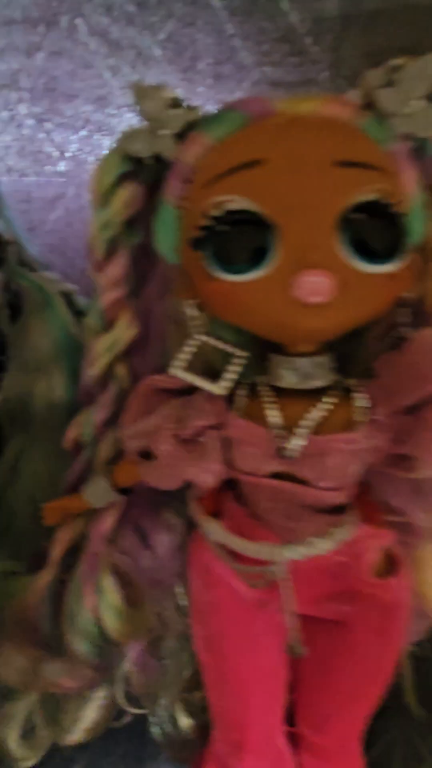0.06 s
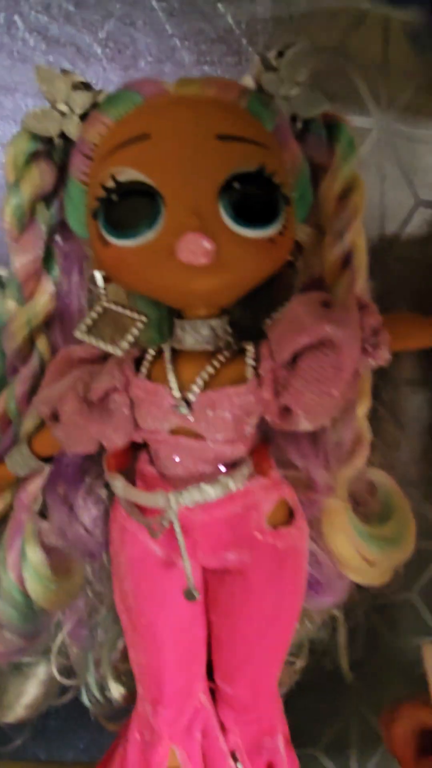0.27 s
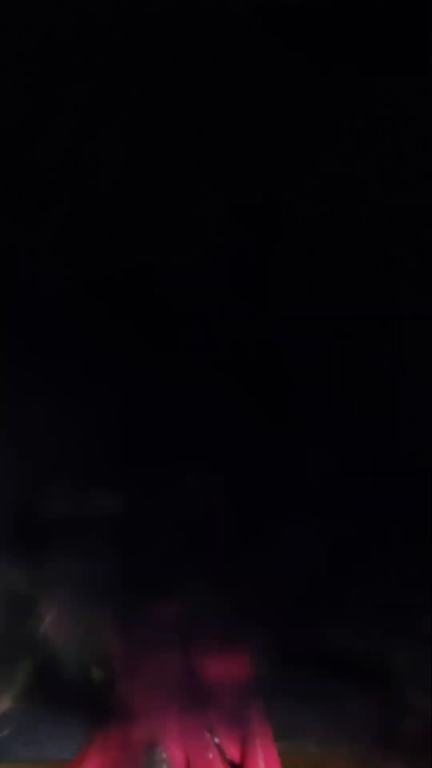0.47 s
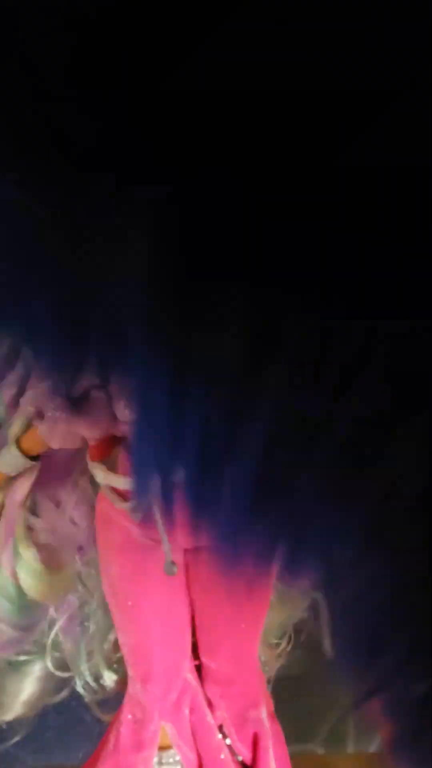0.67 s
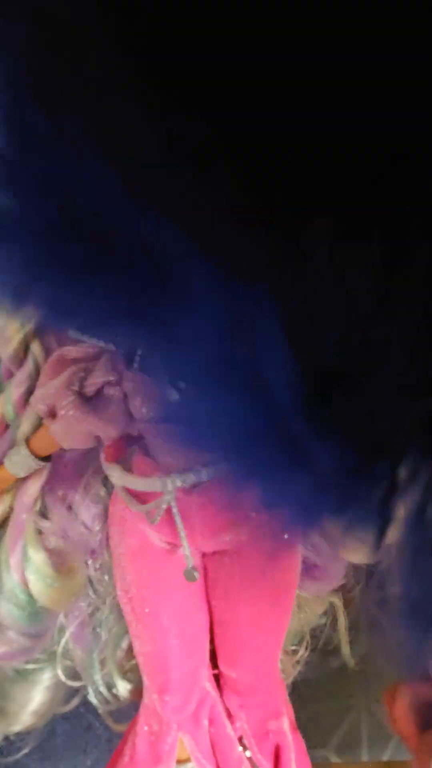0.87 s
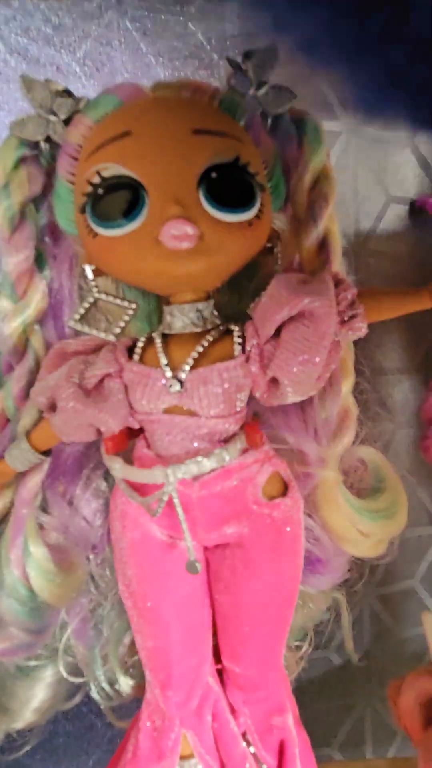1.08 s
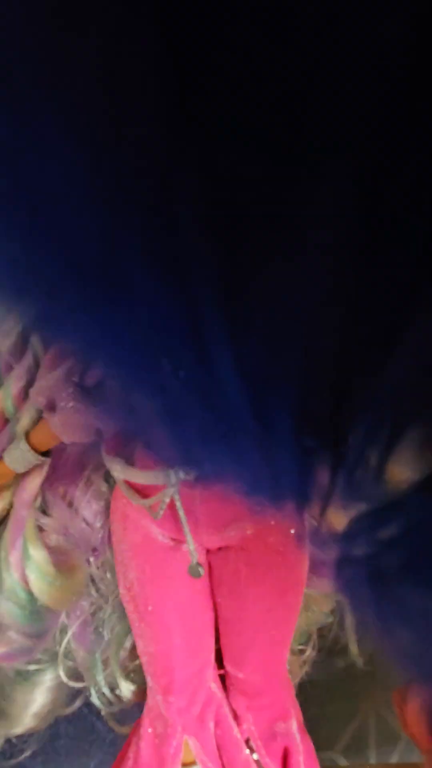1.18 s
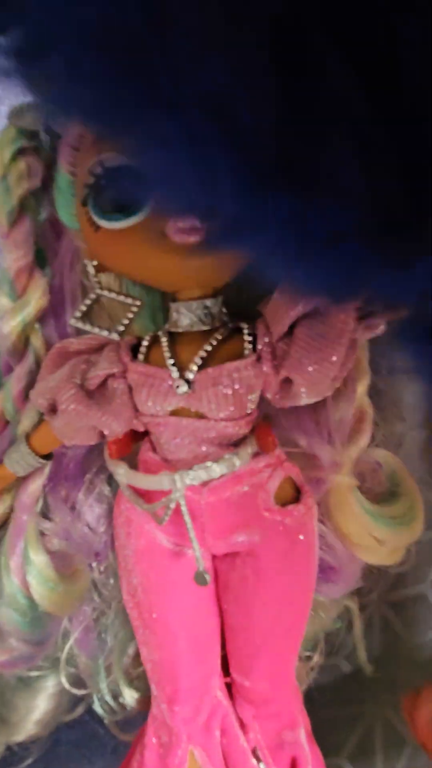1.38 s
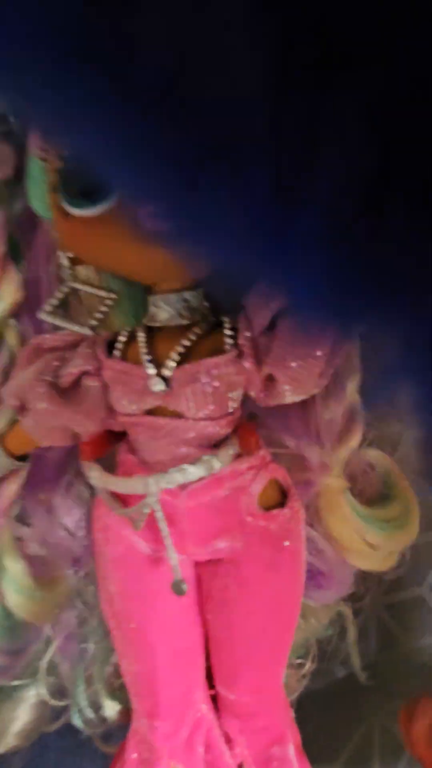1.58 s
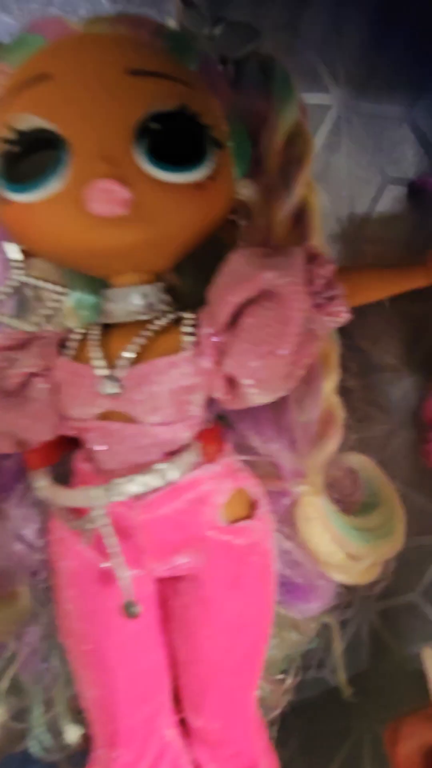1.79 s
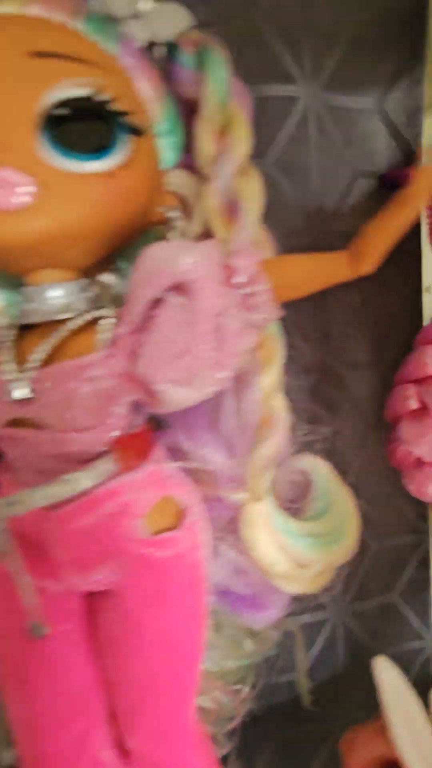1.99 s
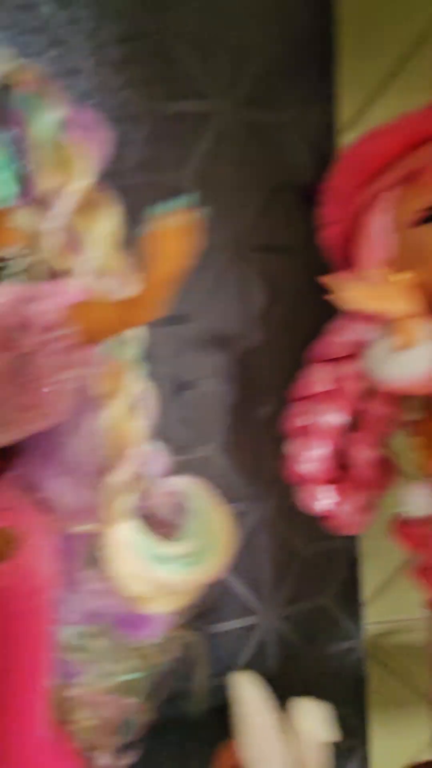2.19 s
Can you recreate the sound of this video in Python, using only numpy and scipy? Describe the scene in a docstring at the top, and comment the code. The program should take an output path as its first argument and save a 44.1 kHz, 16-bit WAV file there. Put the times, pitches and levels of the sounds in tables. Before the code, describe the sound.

Soft fibre brushing in uneven strokes against the left microphone, with dull thumps, in a quiet room

```python
"""From the start a low hum and faint room air, a sine and coloured noise, lie under a quiet room.
A fluffy duster is then swept several times over a small doll. Its fibres rustle on the left microphone
port as coloured random slips; the soft head bumps the housing as short low pulses; single fibres tick
as filtered clicks. The right microphone hears almost none of this. Late in the sweeping something small
and hard clacks in the room and bounces: impulses that set decaying modes ringing, and on the left a
filtered click for its low knock."""
import sys
import numpy as np
from scipy import signal
from scipy.fft import rfft, irfft
from scipy.io import wavfile

SR = 44100
rng = np.random.default_rng(int(sys.argv[2]) if len(sys.argv) > 2 else 0)


def materialize(psi):
    """Save the field psi as 16-bit PCM at rate SR to the path in sys.argv[1].

    A 1-D psi becomes a single channel; in a 2-D psi each row is a channel.
    """
    bounded = np.clip(np.atleast_2d(psi).T, -1, 1)
    quanta = np.round(bounded * 32767).astype(np.int16)
    wavfile.write(sys.argv[1], SR, quanta)


N = 99225
TIME = np.arange(N) / SR  # t/s

# Hum, rms: [t/s, left level/dB, right level/dB]
HUM_LEVEL = [(0, -61, -61), (.8, -55, -74.5), (1.1, -68, -75.5), (1.6, -54, -60), (2.25, -55, -59)]
HUM_HZ = 105.2
# Spectral density of the room air: [f/Hz, relative level/dB per Hz]
AIR_SPECTRUM = [(60, 5), (200, -11.5), (350, -12.5), (700, -21.5), (2500, -28), (3300, -34), (4600, -29),
                (6500, -40), (10000, -41)]
# Level of the room air, rms: [t/s, level/dB]
AIR_LEVEL = [(0, -65.5), (.3, -70.5), (1.0, -73)]

# Fibres on the port, before the trims: [t/s, body level/dB, middle level/dB, treble level/dB]
BRUSH_LEVEL = [(0.142, -95, -110, -110), (0.182, -81, -88, -65), (0.235, -91, -98, -95),
               (0.345, -81, -80, -81.5), (0.386, -63, -61, -72), (0.412, -52, -45.5, -47),
               (0.477, -71, -33.5, -51), (0.505, -63, -44, -50), (0.623, -59.5, -35.5, -47.5),
               (0.649, -64.5, -51, -83), (0.704, -53.5, -39, -53), (0.739, -57, -44, -48),
               (0.786, -64, -66, -77), (0.852, -66.5, -66.5, -71.5), (0.861, -46, -47, -70),
               (0.882, -60, -53.5, -59), (0.892, -49.5, -44.5, -47.5), (0.904, -41.5, -30.5, -46.5),
               (0.933, -49.5, -48, -56), (1.006, -69, -58, -63.5), (1.099, -100, -100, -92),
               (1.155, -54, -65.5, -82), (1.203, -55, -66, -58.5), (1.235, -32.5, -41.5, -46.5),
               (1.258, -66, -74.5, -69.5), (1.386, -87, -82, -83.5), (1.41, -42.5, -57, -52.5),
               (1.451, -65.5, -63, -69), (1.527, -43, -47, -53), (1.549, -77, -68, -71),
               (1.594, -75, -74, -78), (1.61, -49.5, -63, -65.5), (1.66, -51.5, -51, -63),
               (1.689, -56, -40.5, -56.5), (1.77, -49, -48, -59.5), (1.802, -77, -74, -73.5)]
BODY_TRIM_DB, MIDDLE_TRIM_DB, TREBLE_TRIM_DB = 11.5, -3, -2.5
# Spectral densities of the three parts of the rustle: [f/Hz, relative level/dB per Hz]
BODY_SPECTRUM = [(25, 0.5), (70, 12.5), (200, 1.5), (400, -8.5), (650, -14), (2500, -49.5)]
MIDDLE_SPECTRUM = [(250, 6), (600, -2), (850, -1), (1030, -6), (1330, -3.5), (2100, -8), (3500, -14),
                   (9000, -24)]
TREBLE_SPECTRUM = [(1500, -2), (4000, -5), (6600, -3), (7300, 1.5), (8200, -0.5), (9100, 2.5), (9900, -12),
                   (11500, -2.5), (15000, -3.5)]
# Mean rate of fibre slips: [body/(1/s), middle/(1/s), treble/(1/s)]
SLIP_RATE = (9000, 3000, 9000)
SLIP_SPREAD_DB, CLUMP_DB, CLUMP_RATE_HZ = 2.5, 2, 119
EDGE_FADE_S = 0.067  # time constant outside the first and last brush times

LEAK_ABOVE_HZ, RIGHT_LEAK_DB = 2000, -36.5
ROOM_T60_S, ROOM_DB = 0.16, -7.5

# Soft bumps on the housing: [t of the middle/s, envelope level/dB, f/Hz, envelope length/s]
BUMPS = [(0.252, -25.5, 55.8, 0.0067), (0.344, -34, 42.6, 0.0089), (0.863, -23.5, 69, 0.0024),
         (0.875, -17.5, 172, 0.0009), (0.8928, -15, 139, 0.0017), (0.914, -22, 44.2, 0.012),
         (1.038, -43, 53, 0.014), (1.213, -17, 128, 0.0019), (1.248, -20, 79, 0.0034),
         (1.27, -21.5, 61.8, 0.013), (1.429, -28.5, 69.7, 0.0057), (1.546, -20, 91, 0.0029),
         (1.564, -27.5, 71.6, 0.0097), (1.616, -22, 124.4, 0.0039), (1.798, -33, 49, 0.025)]

# Single fibres flicking the port, and at 1.403 s the low knock of the clack on the left:
# [t/s, peak level/dB, centre f/Hz, top edge f/Hz]
TICKS_AND_KNOCK = [(.344, -55, 9500, 15000), (0.357, -49, 9500, 14900), (0.376, -37.5, 169, 1570),
                   (0.472, -33, 1700, 4740), (.487, -30, 1400, 2830), (.692, -36.5, 2500, 12000),
                   (.824, -38.5, 5160, 7700), (.874, -28, 232, 2470), (.887, -27, 283, 5000),
                   (0.982, -29.5, 520, 14000), (1.180, -42.5, 130, 3900), (1.214, -28, 180, 5960),
                   (1.236, -29, 570, 9200), (1.403, -32.5, 132, 890), (1.713, -34, 2200, 4500)]
TICK_DECAY_S, TICK_CRUMBLE = 0.0034, 0.065  # crumble is noise height relative to the click

# Clack and its bounces: [t/s, level/dB, extra treble level/dB]
CLACKS = [(1.403, -43.5, -11), (1.41, -49, -4), (1.416, -42.5, -1.5), (1.422, -45.5, -1.5)]
# Modes of the clacking object: [f/Hz, relative level/dB, t60/s]
CLACK_MODES = [(1355, 0, 0.012), (1554, -5, 0.015), (1846, -8, 0.042), (1920, -8.5, 0.024),
               (2406, -20.5, 0.05), (4950, -8.5, 0.039), (5430, -14, 0.022), (5900, -8, 0.0091),
               (9150, -16, 0.02)]
CLACK_TREBLE_HZ, CONTACT_S, CLACK_LEFT_DB = 3000, 0.0013, -6.5

CUTOFF_HZ = 15750


def from_db(db):
    """A level in decibels is twenty times the logarithm of the amplitude ratio returned."""
    return 10 ** (np.asarray(db) / 20)


def rms_one(x):
    """Normalization divides a signal by its root mean square."""
    return x / np.sqrt(np.mean(x ** 2) + 1e-20)


def in_time(rows):
    """Linear interpolation carries each column of a curve to every sample."""
    times, *columns = np.transpose(rows)
    return [np.interp(TIME, times, column) for column in columns]


def coloured(x, spectrum):
    """Spectral weighting, interpolated over log frequency, colours a signal; rms 1."""
    hz, db = np.transpose(spectrum)
    grid = np.maximum(np.fft.rfftfreq(N, 1 / SR), 1)
    weight = from_db(np.interp(np.log(grid), np.log(hz), db))
    return rms_one(irfft(rfft(x) * weight, N))


def background():
    """Superposition: a hum of fixed pitch, varying as the microphones move, over broadband room air."""
    hum = from_db(in_time(HUM_LEVEL)) * np.sqrt(2) * np.sin(2 * np.pi * HUM_HZ * TIME)
    air = coloured(rng.standard_normal((2, N)), AIR_SPECTRUM)
    return hum + from_db(in_time(AIR_LEVEL)) * air


def drift(rate_hz):
    """Two-pole low-pass filtering of white noise gives smooth chance with spread 1."""
    r = np.exp(-2 * np.pi * rate_hz / SR)
    noise = rng.standard_normal(2 * N)
    # the first half lets the filter settle
    return rms_one(signal.lfilter([1], [1, -2 * r, r * r], noise)[N:])


def rustle():
    """Stick-slip friction: thousands of fibre slips a second, clumped, sparsest in the middle part."""
    clumps = from_db(CLUMP_DB * drift(CLUMP_RATE_HZ))
    trims = (BODY_TRIM_DB, MIDDLE_TRIM_DB, TREBLE_TRIM_DB)
    spectra = (BODY_SPECTRUM, MIDDLE_SPECTRUM, TREBLE_SPECTRUM)
    out = 0
    for level_db, trim_db, spectrum, rate in zip(in_time(BRUSH_LEVEL), trims, spectra, SLIP_RATE):
        spread_db = SLIP_SPREAD_DB * np.minimum(rng.exponential(1, N), 4)
        sizes = from_db(spread_db) * rng.choice([-1, 1], N)
        slips = sizes * (rng.random(N) < rate / SR)
        out = out + from_db(level_db + trim_db) * coloured(slips * clumps, spectrum)
    before_s = np.maximum(BRUSH_LEVEL[0][0] - TIME, 0)
    after_s = np.maximum(TIME - BRUSH_LEVEL[-1][0], 0)
    return out * np.exp(-(before_s + after_s) / EDGE_FADE_S)


def room(x):
    """Diffuse reverberation: convolution with exponentially decaying noise, independent on each side."""
    tail = rng.standard_normal((2, N)) * np.exp(-np.log(1000) * TIME / ROOM_T60_S)
    tail /= np.sqrt(np.sum(tail ** 2, axis=1, keepdims=True))  # unit energy
    return x + from_db(ROOM_DB) * signal.fftconvolve(x, tail, axes=1)[:, :N]


def bumps():
    """Pressure pulses: each soft push is a low sine that swells and fades under a sech envelope."""
    out = np.zeros(N)
    for middle, db, hz, length in BUMPS:
        offset = TIME - middle
        envelope = from_db(db) / np.cosh(np.clip(offset / length, -20, 20))
        out += envelope * np.sin(2 * np.pi * hz * offset)
    return out


def burst(start, decay_s):
    """Impulsive excitation: a unit click, then exponentially decaying noise as its crumble."""
    age = TIME - start
    decay = (age >= 0) * np.exp(-np.abs(age) / decay_s)
    out = TICK_CRUMBLE * decay * rng.standard_normal(N) + 1e-18
    out[int(start * SR)] = 1
    return out


def ticks_and_knock():
    """Filtered impulses: stiffer fibres snap free, and the clack knocks low, each under a steep top edge."""
    out = np.zeros(N)
    for start, db, centre_hz, top_hz in TICKS_AND_KNOCK:
        # the band reaches an octave either side of the centre
        low_hz, high_hz, top_hz = np.clip([centre_hz / 2, centre_hz * 2, top_hz], 20, .49 * SR)
        band = signal.butter(1, [low_hz, high_hz], "band", fs=SR, output="sos")
        edge = signal.butter(6, top_hz, "low", fs=SR, output="sos")
        click = signal.sosfilt(edge, signal.sosfilt(band, burst(start, TICK_DECAY_S)))
        out += from_db(db) * click / np.abs(click).max()
    return out


def ring(x, hz, t60):
    """Damped resonance: a unit click sets a decaying sine of initial height 1 ringing."""
    r = from_db(-60 / (t60 * SR))
    w = 2 * np.pi * hz / SR
    return signal.lfilter([0, np.sin(w)], [1, -2 * r * np.cos(w), r * r], x)


def clack():
    """Modal excitation: a small hard object knocks and bounces, its mode mix drawn for each microphone."""
    out = np.zeros((2, N))
    for hz, mode_db, t60 in CLACK_MODES:
        for side in out:
            contacts = np.zeros(N)
            for start, db, treble_db in CLACKS:
                at = int((start + CONTACT_S * rng.random()) * SR)
                level_db = db + mode_db + treble_db * (hz > CLACK_TREBLE_HZ) + rng.normal()
                contacts[at] += from_db(level_db) * rng.choice([-1, 1])
            side += ring(contacts + 1e-18, hz, t60)
    return out * from_db([[CLACK_LEFT_DB], [0]])


def scene():
    """Contact and airborne paths: the left takes duster and knock direct, a faint treble leaks right."""
    left_port = rustle() + bumps() + ticks_and_knock()
    leak_filter = signal.butter(1, LEAK_ABOVE_HZ, "high", fs=SR, output="sos")
    airborne = signal.sosfilt(leak_filter, left_port)
    far = room(np.array([airborne, airborne]))[1]
    sides = np.array([left_port, from_db(RIGHT_LEAK_DB) * far])
    return sides + room(clack()) + background()


def record(dry):
    """Band limitation: a steep elliptic low-pass removes the top."""
    return signal.sosfilt(signal.ellip(10, .1, 70, CUTOFF_HZ, fs=SR, output="sos"), dry)


dry = scene()
out = record(dry)
materialize(out)
```